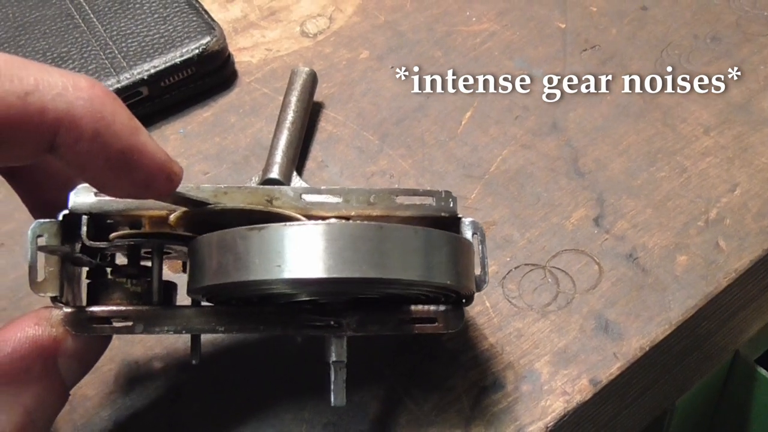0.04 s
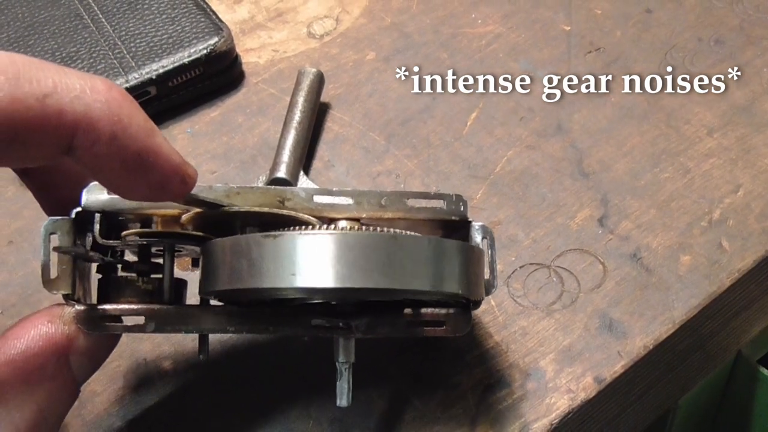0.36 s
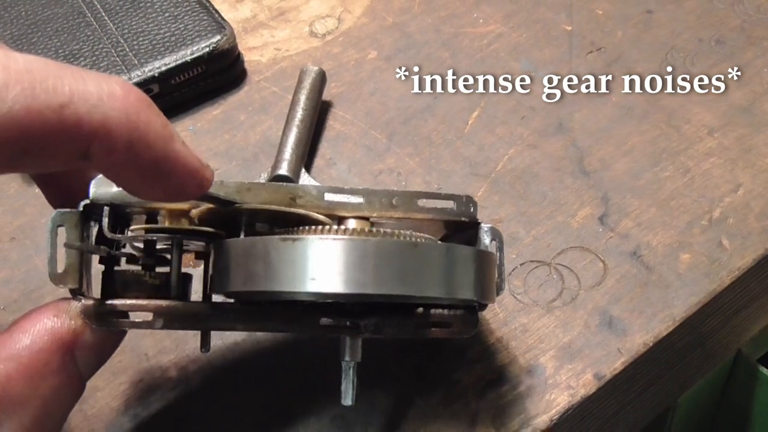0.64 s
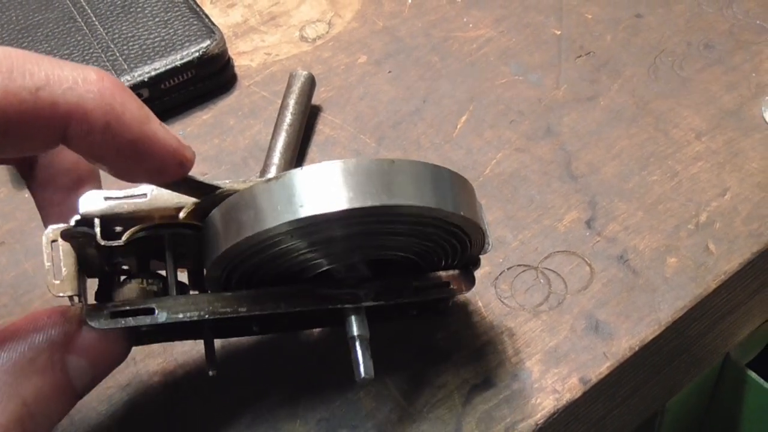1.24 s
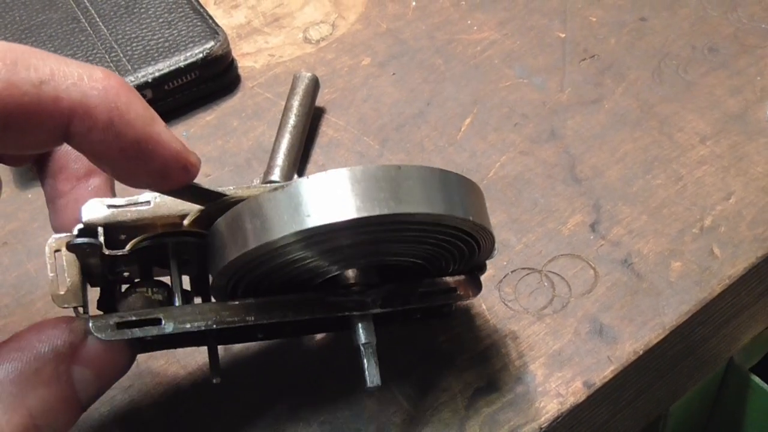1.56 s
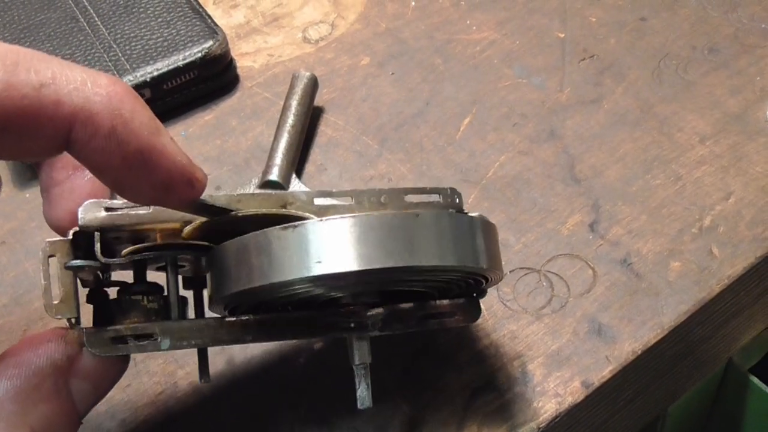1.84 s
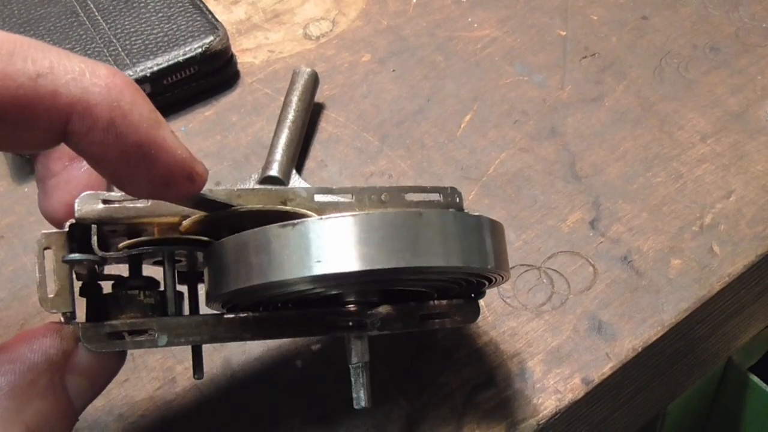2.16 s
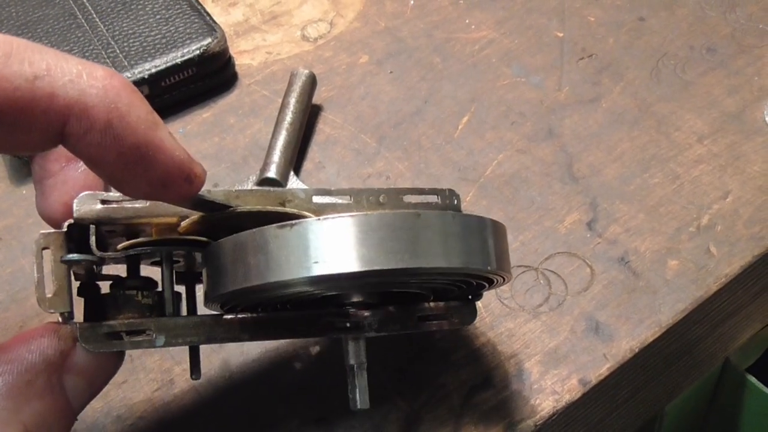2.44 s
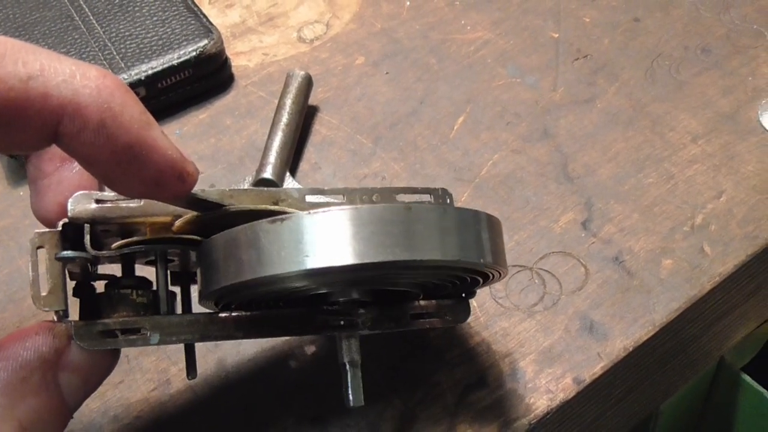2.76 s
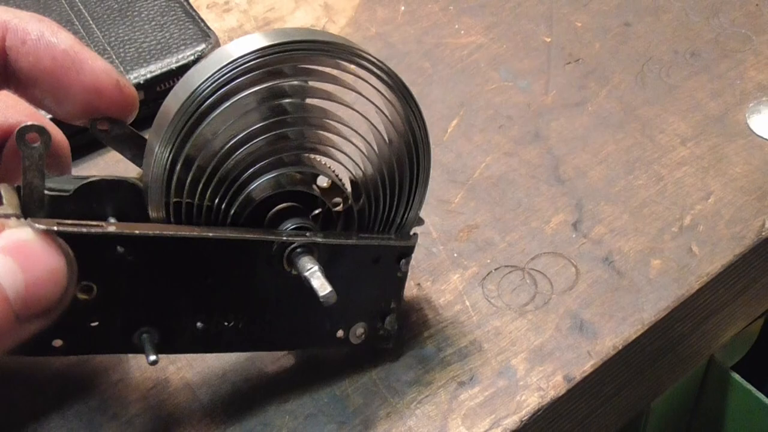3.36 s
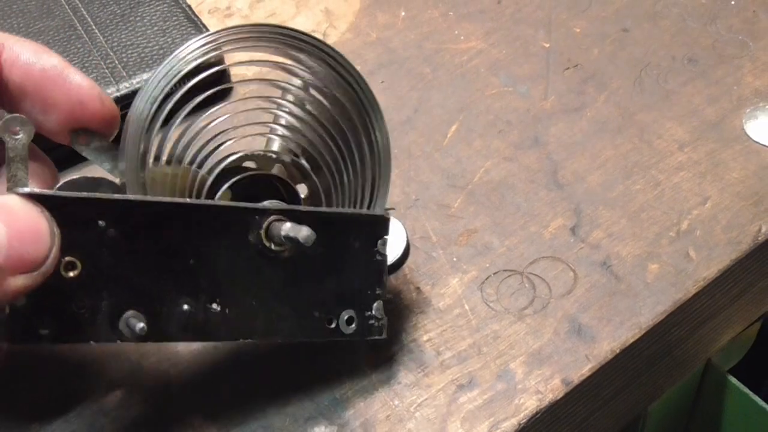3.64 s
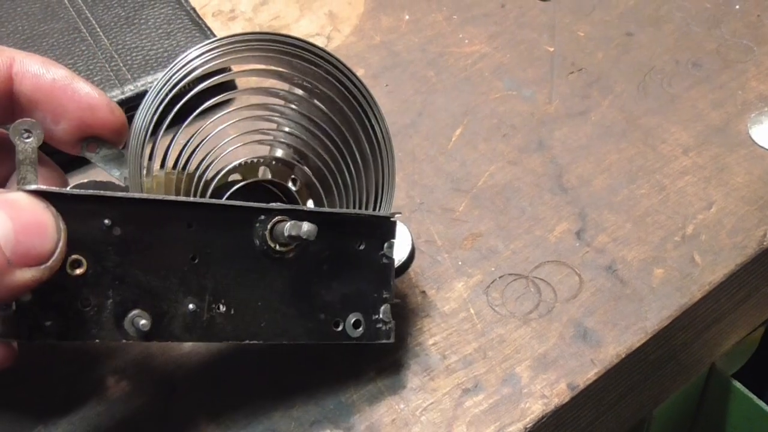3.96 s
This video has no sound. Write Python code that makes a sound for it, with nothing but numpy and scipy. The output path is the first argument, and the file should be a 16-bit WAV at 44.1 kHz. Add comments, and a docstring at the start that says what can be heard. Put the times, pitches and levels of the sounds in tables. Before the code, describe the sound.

A clockwork motor whirs close by for the whole four seconds, a fast, bright rattle of small metal gears with a slight throb and a thin, high ring. The spring hums faintly underneath, and tiny catches click now and then. From about 3.2 seconds, as the motor is tipped over, light irregular ticks join in and the tone shifts a little while the buzz carries on.

```python
"""A clockwork motor running down.

A wind-up motor is held close above a workbench. Its fastest shaft rattles in its bearings, and the
impacts excite the modes of the frame and of small steel parts. Gear teeth chatter, slower wheels
modulate the rattle into a throb, and the loosening mainspring hums faintly. Tipped over near the end,
the motor ticks harder against its plates and its treble shifts."""
import sys
import numpy as np
from scipy import signal
from scipy.fft import rfft, irfft
from scipy.io import wavfile

SR = 44100
rng = np.random.default_rng(int(sys.argv[2]) if len(sys.argv) > 2 else 0)


def materialize(psi):
    """Save the field psi as 16-bit PCM at rate SR to the path in sys.argv[1].

    A 1-D psi becomes a single channel; in a 2-D psi each row is a channel.
    """
    bounded = np.clip(np.atleast_2d(psi).T, -1, 1)
    quanta = np.round(bounded * 32767).astype(np.int16)
    wavfile.write(sys.argv[1], SR, quanta)


N = 176400

# Radiation of the parts as the motor is turned in the hand.
# Each row: time in seconds, then relative levels in dB of frame, pinion and teeth.
PART_LEVELS = [(0.0, -47.5, -31.5, -28.5), (0.4, -49.5, -28, -29), (0.7, -50.5, -28, -29),
               (1.3, -49.5, -31, -27.5), (1.6, -49.5, -28.5, -29), (1.9, -48.5, -31, -28),
               (2.6, -50, -27.5, -29.5), (3.0, -49.5, -28.5, -29.5), (3.3, -49.5, -30, -30),
               (3.6, -48.5, -34.5, -28.5), (4.0, -50.5, -33, -31.5)]
PLATE_SIDE_DB, PINION_SIDE_DB, TEETH_SIDE_DB = -74, -5.5, -12.5  # rasp that differs between the ears


def amp(db):
    """Amplitude ratio of a level in decibels."""
    return 10 ** (np.asarray(db) / 20)


def unit(x):
    """Normalisation to rms 1."""
    return x / np.sqrt(np.mean(x ** 2))


def curve(table, column=1):
    """Linear interpolation of one table column in time."""
    table = np.array(table)
    return np.interp(np.arange(N) / SR, table[:, 0], table[:, column])


def gains(points, size):
    """Magnitude response on the bins of a transform, from (Hz, dB) points."""
    hz, db = np.array(points).T
    bin_hz = np.arange(size // 2 + 1) * SR / size
    return amp(np.interp(np.log(bin_hz + 1), np.log(hz), db))


def colour(x, points, size=4096):
    """Minimum-phase filtering through a response of (Hz, dB) points."""
    cepstrum = irfft(np.log(gains(points, size)))
    cepstrum[1:size // 2] *= 2
    cepstrum[size // 2 + 1:] = 0
    response = irfft(np.exp(rfft(cepstrum)))
    return np.apply_along_axis(signal.fftconvolve, -1, x, response)[..., :N]


def ring(x, hz, width_hz):
    """Forced response of a damped resonator, at rms 1."""
    return unit(signal.lfilter(*signal.iirpeak(hz, hz / width_hz, SR), x))


def clicks(times, sizes):
    """An impulse train: ideal impacts at times in seconds."""
    at = np.round(np.ravel(times) * SR).astype(int)
    inside = (at >= 0) & (at < N)
    return np.bincount(at[inside], np.ravel(sizes)[inside], N)


def wander(hz, size=2048):
    """Random modulation with spread near 1."""
    return np.interp(np.arange(N) / SR * hz, np.arange(size), rng.standard_normal(size))


def scatter(shape):
    """Uniform random variation with spread 1."""
    return np.sqrt(3) * rng.uniform(-1, 1, shape)


def burst(decay_s, size=16384):
    """Exponentially decaying noise of unit energy."""
    x = rng.standard_normal(size) * np.exp(-np.arange(size) / SR / decay_s)
    return x / np.linalg.norm(x)


def still_air(level_db=-66):
    """Ambient noise: a faint, steady broadband floor."""
    # Each row: frequency in Hz, relative level in dB.
    spectrum = [(25, -27), (70, -18), (200, 2), (1000, 5), (10000, -15)]
    return amp(level_db) * unit(colour(rng.standard_normal(N), spectrum))


def mainspring_hum(gain_db=-3, flutter_db=4, waver_hz=29.92):
    """Modal vibration: the shaken coils hum in partials that waver in pitch and level."""
    # Each row: mode frequency in Hz, greatest deviation in Hz.
    modes = [(125, 3), (221, 5.5), (233, 4.5), (261, 7), (350, 7), (371, 9.5), (436, 8)]
    # Each row: time in seconds, then the relative level of each mode in dB.
    levels = [(0.0, -79, -63, -77, -58.5, -66, -78, -80), (0.4, -73, -60, -75, -55, -67, -71, -67),
              (0.58, -74, -66, -76, -60, -65, -76, -77), (0.9, -70, -63.5, -70, -62, -69, -79, -70),
              (1.15, -69, -66, -76, -54, -54.5, -72, -86), (1.55, -80, -70, -64.5, -67, -82, -69, -73),
              (2.0, -86, -72, -61.5, -81, -72, -66, -74), (2.45, -74, -71.5, -84, -70, -76, -65, -63),
              (2.75, -79, -71, -76, -80, -68, -74, -66), (3.2, -72, -72, -76, -75, -55.5, -72, -76),
              (3.4, -65.5, -69, -76, -64, -61.5, -61, -67), (3.65, -62, -85, -78, -77, -59.5, -62, -70),
              (4.0, -75, -72, -62.5, -74, -71, -86, -87)]
    hum = 0
    for column, (hz, deviation) in enumerate(modes, 1):
        phase = 2 * np.pi * np.cumsum(hz + deviation * np.tanh(wander(waver_hz))) / SR
        level_db = curve(levels, column) + flutter_db * wander(waver_hz)
        hum += np.sqrt(2) * np.sin(phase) * amp(level_db)
    return amp(gain_db) * hum


def coil_bumps(rise_s=.014, gain_db=-46.5):
    """Damped oscillation: the shifting coils give soft, low tone pulses."""
    # Each row: start in seconds, frequency in Hz, relative level in dB.
    bumps = [(.673, 190, 0), (.762, 190, -9), (.765, 282, -5)]
    out = 0
    for start, hz, db in bumps:
        age = np.maximum(np.arange(N) / SR - start, 0)
        swell = age / rise_s
        out += amp(gain_db + db) * np.sin(2 * np.pi * hz * age) * swell * np.exp(1 - swell)
    return out


def wheel_sway(turns, depths):
    """Periodic modulation: each slower wheel adds a sinusoid of its own depth."""
    # Each entry: one wheel's period in turns of the fast shaft.
    periods = [5.48, 7.66, 1.948, 2.07]
    return sum(depth * np.sin(2 * np.pi * turns / n) for depth, n in zip(depths, periods))


def tooth_load(turns, slack_s=.0058, flicker_db=1.1, flicker_hz=80.26):
    """Amplitude modulation in dB: the tooth force throbs, flickers and dips as the train goes slack."""
    # Each row: moment of slack in seconds, change of force in dB.
    slacks = [(1.325, -2), (1.4, -4), (1.64, -5.5), (2.985, -4), (3.21, -2), (3.431, -7.5), (3.52, -5),
              (3.672, -5.5), (3.77, -4.5), (3.875, -2), (3.92, -3)]
    t = np.arange(N) / SR
    throb_db = wheel_sway(turns, depths=(1.12, .24, .78, .23))
    slack_db = sum(db * np.exp(-((t - moment) / slack_s) ** 2) for moment, db in slacks)
    return throb_db + slack_db + flicker_db * np.tanh(wander(flicker_hz))


def tooth_chatter(load_db, per_s=1300, gain_db=-7.5, scatter_db=3.5, count=12000):
    """A Poisson process: meshing teeth make dense small clicks that follow the load."""
    times = np.cumsum(rng.exponential(1, count)) / per_s
    sizes = rng.choice([-1, 1], count) * amp(gain_db + scatter_db * (scatter(count) - .5))
    return clicks(times, sizes) * amp(load_db)


def tooth_snags(decay_s=.0017):
    """Stick and slip: a tooth catches, then scrapes free in a burst of noise."""
    # Each row: start in seconds, relative level in dB.
    catches = [(0.255, 10), (.3165, 6), (0.3449, 9), (0.4183, -1), (.4495, -1), (.478, -2), (0.595, 5),
               (0.686, 6), (1.051, 7), (2.198, 0), (2.51, 11), (2.815, 11), (3.035, 9), (3.184, 8)]
    out = np.zeros(2 * N)
    for start, db in catches:
        slip = amp(db) * burst(decay_s)
        at = int(start * SR)
        out[at:at + len(slip)] += slip
    return out[:N]


def tipped_ticks():
    """Impulsive excitation: the shaft hits the plates once the motor is tipped over."""
    # Each row: time in seconds, relative level in dB.
    hits = [(3.25, -8), (3.264, 2), (3.375, 0), (3.391, -3), (3.474, 0.5), (3.49, -3), (3.503, -4),
            (3.556, -1), (3.573, -1), (3.586, -4), (3.612, 0), (3.629, 1), (3.655, -1), (3.686, -4),
            (3.697, -4), (3.727, -6), (3.754, -4), (3.796, -6), (3.837, -8), (3.851, 2.5), (3.937, 1)]
    times, db = np.array(hits).T
    return clicks(times, amp(db))


def scrape(blows, side_db, decay_s=.0013, rasp_db=9.5):
    """Sliding friction: each click trails a brief rasp, partly different at the two ears."""
    fade = np.exp(-2 / (decay_s * SR))
    energy = signal.lfilter([1 - fade], [1, -fade], blows ** 2)
    envelope = amp(rasp_db) * np.sqrt(energy + 1e-18)
    mid, side = envelope * rng.standard_normal((2, N))
    return blows + mid + amp(side_db) * side * np.array([[1], [-1]])


def frame_knocks(blows, chatter, rasp_db=-21, gain_db=1.5):
    """Structural resonance: the struck frame knocks broadly and rings in narrow modes."""
    # Each row: frequency in Hz, relative response in dB.
    response = [(30, -19), (70, -38), (160, -31), (300, -13), (550, -18), (800, -8), (1080, 1.5), (1320, 2),
                (1520, -5), (1750, -23), (2150, -4), (2700, -26), (5000, -35)]
    # Each row: mode frequency in Hz, bandwidth in Hz, relative level in dB.
    modes = [(769, 20, -21), (1057, 36, -13), (1204, 34, -13), (1278, 29, -15)]
    rasp = amp(rasp_db) * scrape(blows + chatter, TEETH_SIDE_DB)
    knocks = unit(colour(blows + rasp, response))
    whirr = sum(amp(db) * ring(blows, hz, width) for hz, width, db in modes)
    return unit(knocks + whirr) * amp(curve(PART_LEVELS, 1) + gain_db)


def plate_rings(blows, chatter, ticks, cutoff_hz=3190, gain_db=-2.5):
    """Plate modes: the small struck plates ring, but radiate little below a cutoff."""
    # Each row: mode frequency in Hz, bandwidth in Hz.
    modes = [(3280, 310), (4150, 150), (4370, 280), (5030, 280)]
    # Each row: time in seconds, then the relative level of each mode in dB.
    levels = [(0.0, -45, -49.5, -42, -42), (0.7, -49.5, -38.5, -49.5, -41), (1.3, -46, -45, -48, -40),
              (2.0, -50, -39, -40, -44), (2.6, -59, -42.5, -34, -54), (3.05, -46.5, -43, -37.5, -50),
              (3.35, -41, -37.5, -47, -57), (3.6, -40.5, -33.5, -42.5, -54), (4.0, -43.5, -36, -41, -54)]
    drive = scrape(blows + amp(-10) * chatter, PLATE_SIDE_DB) + amp(18) * ticks
    drive = signal.sosfilt(signal.butter(6, cutoff_hz, "high", fs=SR, output="sos"), drive)
    return sum(ring(drive, *mode) * amp(curve(levels, column) + gain_db)
               for column, mode in enumerate(modes, 1))


def high_rings(blows, chatter, snags, gain_db=3):
    """Resonance: blows, chatter and snags excite the two highest modes of the steel."""
    # Each row: mode frequency in Hz, bandwidth in Hz.
    modes = [(11915, 180), (12310, 120)]
    # Each row: time in seconds, then relative levels in dB of the lower and upper mode.
    levels = [(0.0, -37, -37), (0.45, -35.5, -29), (0.75, -36.5, -43.5), (1.5, -42, -45), (1.85, -34, -37),
              (2.2, -39, -62), (2.6, -40.5, -56), (3.2, -34.5, -50), (3.6, -38, -51), (4.0, -54, -48)]
    out = 0
    for column, mode in enumerate(modes, 1):
        drive = scrape(blows + chatter, PINION_SIDE_DB) + amp(7) * snags
        out += ring(drive, *mode) * amp(curve(levels, column) + gain_db)
    return out


def pinion_ring(blows, chatter, rasp_db=-8, gain_db=-2):
    """Light damping: blows of random sign keep one narrow mode of the pinion ringing."""
    pings = blows * rng.choice([-1, 1], N)
    rasp = amp(rasp_db) * scrape(blows + amp(-12) * chatter, PINION_SIDE_DB)
    return ring(pings + rasp, hz=7275, width_hz=68) * amp(curve(PART_LEVELS, 2) + gain_db)


def treble_sweep(x, width_hz=510, shelf_hz=12200, size=512):
    """Moving colour: a bright band slides through the treble while the top is shaded."""
    # Each row: time in seconds, band centre in Hz, band gain in dB, top shelf gain in dB.
    tilts = [(0.0, 9700, 1, -4), (0.5, 9700, -0.5, -6.5), (1.3, 9700, 0, -5), (1.9, 10840, 5, -3),
             (2.7, 10200, 3, -4), (3.2, 10600, 7, -3), (3.42, 11000, 4, -7), (3.58, 8500, 3, -7),
             (4.0, 8800, 2.5, -2)]
    times, *columns = np.array(tilts).T
    hz, t, bins = signal.stft(x, SR, nperseg=size)
    centre, band_db, shelf_db = (np.interp(t, times, column) for column in columns)
    band = np.exp(-((hz[:, None] - centre) / width_hz) ** 2)
    shelf = .5 + .5 * np.tanh((hz[:, None] - shelf_hz) / width_hz)
    return signal.istft(bins * amp(band_db * band + shelf_db * shelf), SR, nperseg=size)[1][..., :N]


def gear_mesh(blows, chatter, ticks, snags, gain_db=3):
    """Broadband excitation: brief contacts on the teeth radiate a bright rattle."""
    # Each row: frequency in Hz, relative response in dB.
    response = [(1500, -26), (2650, -21.5), (3200, -11.5), (3600, -12.5), (4050, -7), (5000, -5.5),
                (5500, -5), (5900, -12), (6400, -12.5), (7000, -1), (7650, -1), (8200, 1.5), (8800, 0.5),
                (9200, 3), (10400, 1), (11000, -2.5), (12100, -0.5), (12900, -1), (13600, 1.5), (14100, -3),
                (14500, -10), (16000, -3)]
    drive = scrape(blows + chatter + amp(-1) * ticks, TEETH_SIDE_DB) + amp(8) * snags
    return unit(treble_sweep(colour(drive, response))) * amp(curve(PART_LEVELS, 3) + gain_db)


def shaft_turns(wow_turns=.02, wow_hz=10):
    """Phase as the integral of rate: turns of the fast shaft, running slightly ahead and behind."""
    # Each row: time in seconds, knock rate in Hz at two knocks to a turn.
    knock_rate = [(0.0, 138.2), (0.4, 136.2), (0.8, 136.5), (1.2, 140), (1.6, 142), (2.0, 147.2),
                  (2.4, 147.4), (2.8, 146.9), (3.2, 145.9), (3.36, 144.5), (3.43, 138.5), (3.47, 143.8),
                  (4.0, 142.7)]
    return np.cumsum(curve(knock_rate)) / SR / 2 + wow_turns * wander(wow_hz)


def bounce(times, sizes, delay_s=.0008, rebound_db=-4):
    """Rebound: each impact on steel is followed by one more, of random delay and size."""
    later = times + delay_s * np.abs(scatter(times.shape))
    return clicks(times, sizes) + clicks(later, sizes * amp(rebound_db) * scatter(times.shape))


def shaft_blows(turns, load_db, jitter_turns=.005, scatter_db=3.4, limit_db=2, turn_count=310):
    """Periodic impact: the rattling shaft strikes frame, plates, pinion and teeth in every turn."""
    # Each row: place in turns, then relative strength in dB on frame, plates, pinion and teeth.
    contacts = [(0.28, -4, 0, -2, -0.5), (.5, -14, 2.5, 6, -3), (.76, -6, -1.5, 3.5, -1),
                (0.88, -49, -13, 5.5, -7), (.1, -32, -2, -36, -1)]
    offsets, *parts_db = np.array(contacts).T
    t = np.arange(N) / SR
    place = np.arange(turn_count)[:, None] + offsets
    lag_turns = wheel_sway(place, depths=(.011, .007, .002, .0022))
    place += jitter_turns * scatter(place.shape) + lag_turns
    times = np.interp(place, turns, t, right=-1)  # contacts past the end are dropped
    force_db = np.interp(times, t, load_db) + scatter_db * scatter(place.shape)
    force = amp(limit_db) * np.tanh(amp(force_db - limit_db))  # the hardest blows saturate
    frame, *steel = [force * amp(db) for db in parts_db]
    return [clicks(times, frame)] + [bounce(times, sizes) for sizes in steel]


def gear_train():
    """Source and filter: blows, chatter, ticks and snags drive the resonant parts of the motor."""
    turns = shaft_turns()
    load_db = tooth_load(turns)
    on_frame, on_plates, on_pinion, on_teeth = shaft_blows(turns, load_db)
    chatter, snags, ticks = tooth_chatter(load_db), tooth_snags(), tipped_ticks()
    return (frame_knocks(on_frame, chatter)
            + plate_rings(on_plates, chatter, ticks)
            + pinion_ring(on_pinion, chatter)
            + gear_mesh(on_teeth, chatter, ticks, snags)
            + high_rings(on_pinion, chatter, snags))


def scene(room_t60_s=.2, room_db=-13.5, right_lead_s=7e-6):
    """Interaural differences place the motor slightly to the right, in faint reverberation."""
    # Each row: frequency in Hz, left minus right level in dB.
    balance = [(100, 0), (300, -0.5), (1300, 2.5), (2400, -1), (6200, 0.5), (7280, 3.5), (8000, -0.5),
               (10300, 1), (11900, -3.5), (12300, -7), (14000, -10.5), (15500, 18)]
    motor = gear_train() + mainspring_hum() + coil_bumps()
    air = still_air()
    hz = np.arange(N // 2 + 1) * SR / N
    ears = []
    for direct, side in zip(motor, (1, -1)):
        echo = amp(room_db) * signal.fftconvolve(direct, burst(room_t60_s / np.log(1000)))[:N]
        ear_gain = gains(balance, N) ** (side / 2)
        ear_delay = np.exp(-1j * side * np.pi * hz * right_lead_s)
        ears.append(irfft(rfft(direct + echo) * ear_gain * ear_delay) + air)
    return np.array(ears)


def record(dry):
    """Band limiting: filters cut the deep bass and the very top."""
    low_cut = signal.butter(2, 108, "high", fs=SR, output="sos")
    high_cut = signal.ellip(10, .2, 80, 15500, fs=SR, output="sos")
    return signal.sosfilt(high_cut, signal.sosfilt(low_cut, dry))


dry = scene()
out = record(dry)
materialize(out)
```